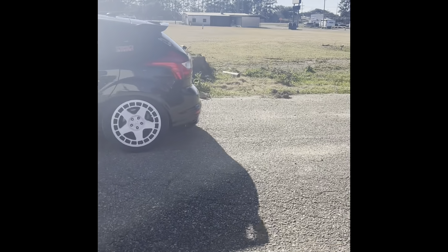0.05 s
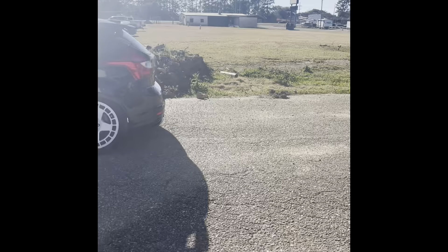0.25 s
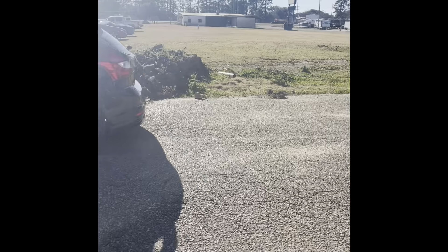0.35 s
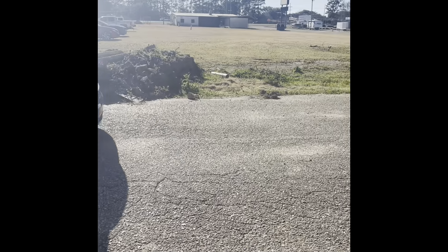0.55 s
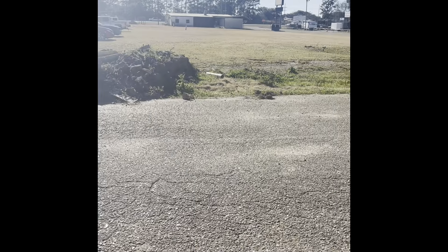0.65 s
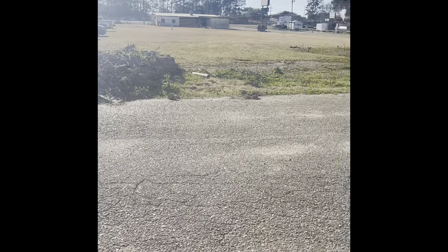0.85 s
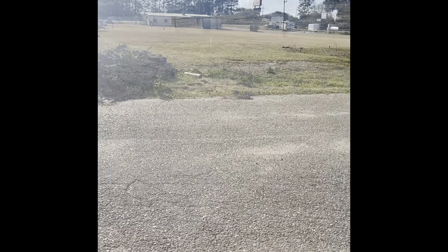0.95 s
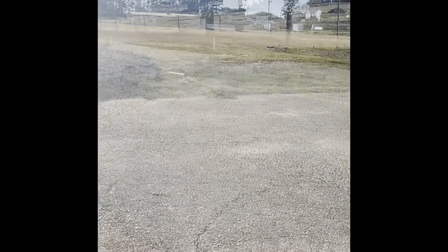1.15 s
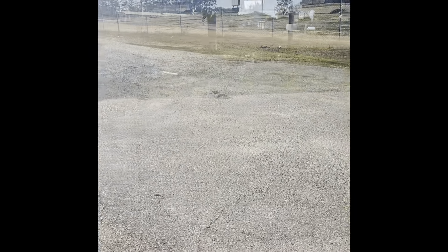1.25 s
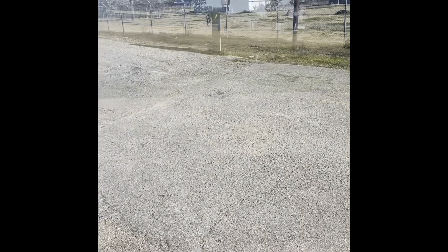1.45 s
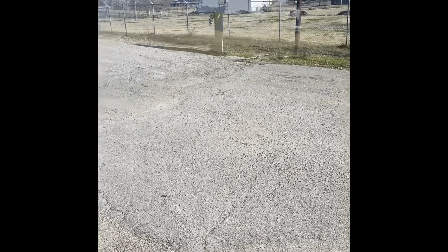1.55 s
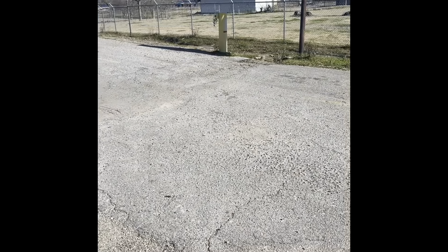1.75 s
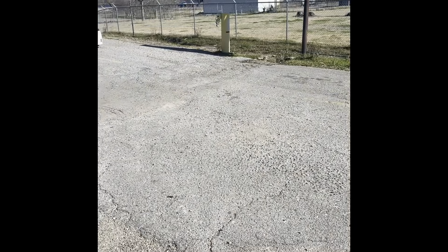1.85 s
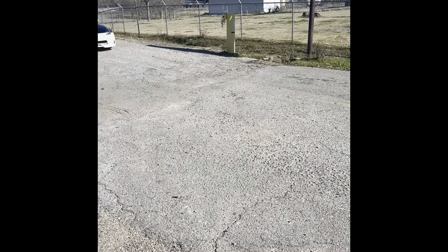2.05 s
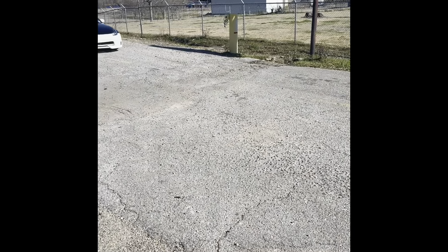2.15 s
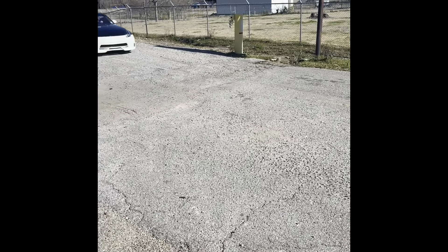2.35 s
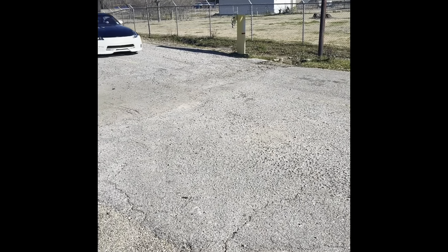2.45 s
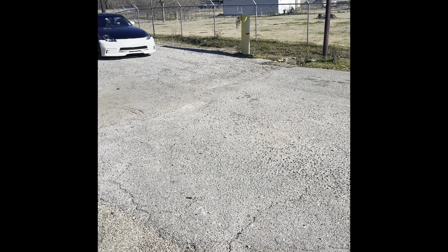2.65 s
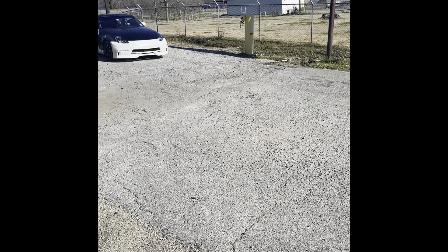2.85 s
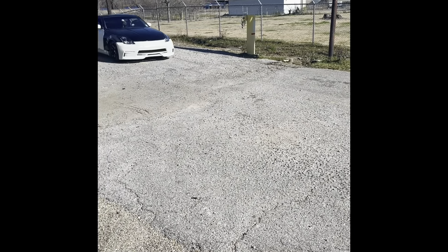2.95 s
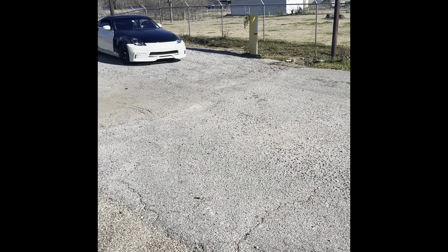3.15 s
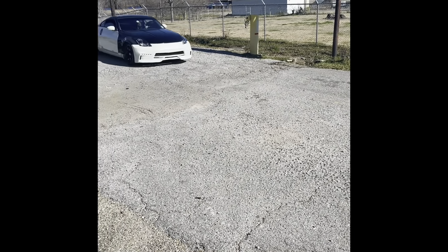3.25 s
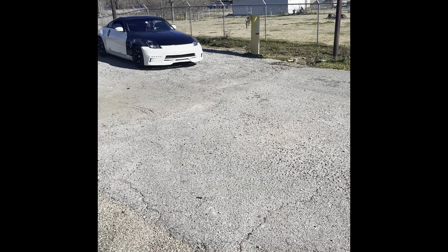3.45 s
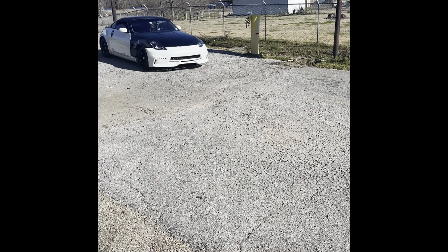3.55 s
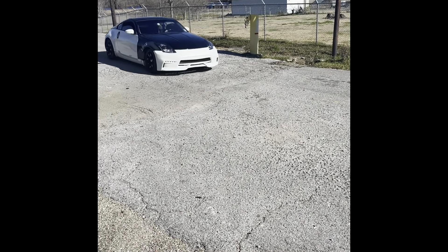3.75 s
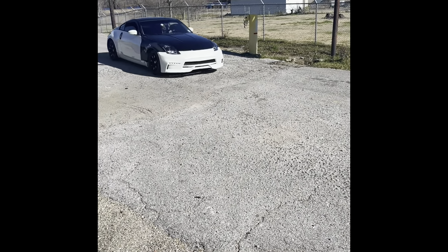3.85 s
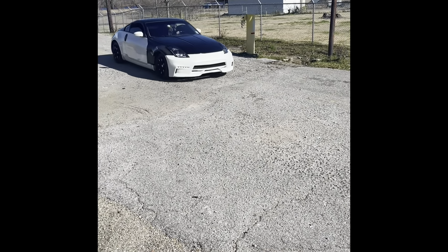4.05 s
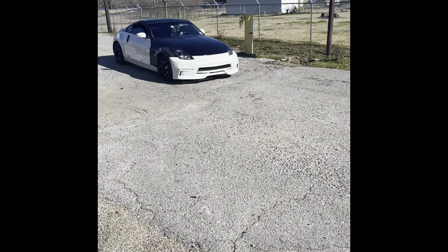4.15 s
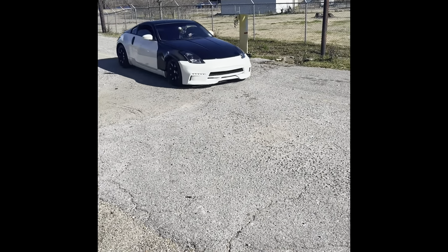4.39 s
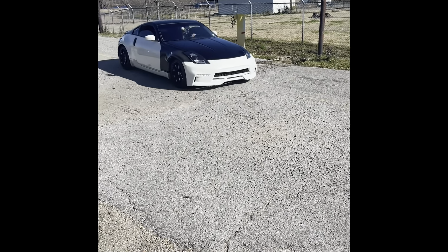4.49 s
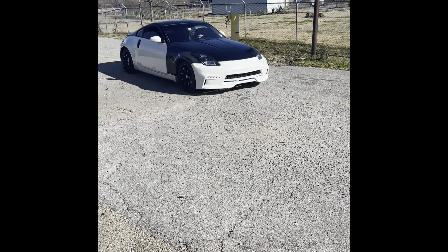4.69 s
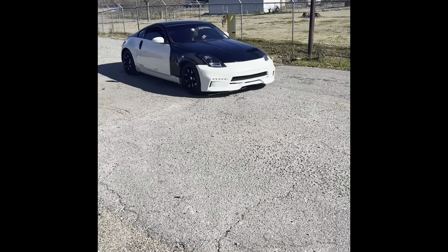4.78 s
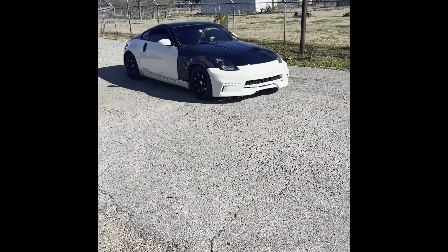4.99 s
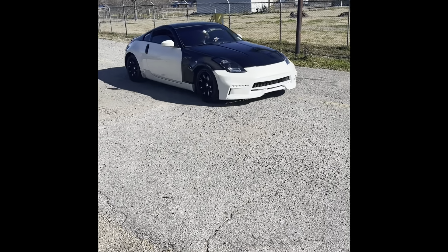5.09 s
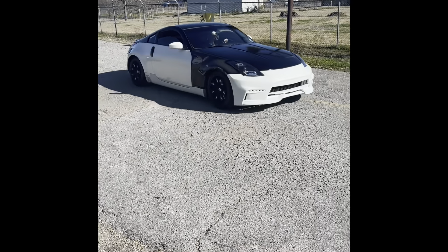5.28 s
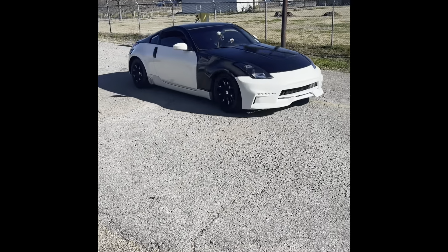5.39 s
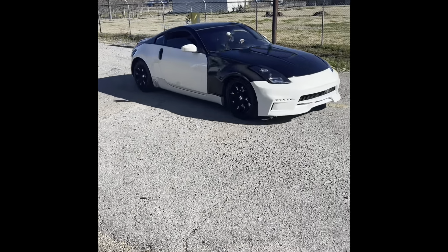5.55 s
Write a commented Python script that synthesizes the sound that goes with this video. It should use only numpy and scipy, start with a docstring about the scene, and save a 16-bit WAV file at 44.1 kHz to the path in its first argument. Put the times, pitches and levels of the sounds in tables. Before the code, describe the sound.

Open-air gravelly lot, light wind, small handheld stereo microphone. From 0 s a close hatchback gives a low, buzzy exhaust drone with a faint wavering whistle around 0.5 s, sinking away by about 1.9 s; a couple of stones knock and a low thump lands near 0.7 s. From 2 to 4 s a soft, deep coupe engine approaches while a farther engine throbs in and out; wind thumps and ragged flutter cluster around 2.6-4 s. Tyres crunch finely, with hollow stone pops thickening from 5 s and sharp knocks near 5.2, 6.2, 6.4 and 7.2 s. The coupe's tone swells from about 5.2 s, revs up in pitch from 6.5 to a peak near 7.2 s, then eases to a steady, brighter hum until about 9.1 s. The far drone returns around 5.4 s, swells near 5.75 s and rises slightly at the end, over thinning grit and stray pops.

```python
"""Gravel lot with cars, in a light wind.
A four-cylinder hatchback drones close by and fades; a six-cylinder coupe rolls up, stops and revs;
a third engine drones farther off. Engines are sums of tones at multiples of their turning rate.
Tyres are crunchy shaped noise; stones are sliding knocks with noise bursts; gusts on the two
microphone ports are low thumps, over lumpy noise opposite in the two ports."""
import sys
import numpy as np
from scipy import signal
from scipy.fft import rfft, irfft
from scipy.io import wavfile

SR = 44100
rng = np.random.default_rng(int(sys.argv[2]) if len(sys.argv) > 2 else 0)


def unload_wav(signal):
    """Save mono or channel-first audio to the path in sys.argv[1] as 16-bit WAV at rate SR, clipped to [-1, 1]."""
    wavfile.write(
        sys.argv[1],
        SR,
        np.round(np.clip(np.atleast_2d(signal).T, -1, 1) * 32767).astype(np.int16),
    )


N = 403074

# hatchback course: (time [s], crank rate [Hz], level [dB], brightness [dB/octave])
HATCH_COURSE = [(0.0, 32.7, -16.5, -4), (0.1, 34.4, -23.5, 8), (0.19, 34.44, -17, -3.5),
                (0.31, 36.08, -19, 0), (0.46, 35.23, -19.5, -2.5), (0.6, 35, -20.5, -0.5),
                (0.655, 35.05, -20, -10.5), (0.72, 35.8, -19.5, -2.5), (0.78, 33.6, -18, -13),
                (0.85, 33.48, -24.5, -4.5), (0.93, 32.6, -25, -6), (1.12, 30.87, -24, -3),
                (1.35, 30.86, -30, -3), (1.6, 30.82, -35.5, -4.5), (1.75, 30.6, -54, -4)]
# hatchback tones: (multiple of crank rate, level [dB])
HATCH_ORDERS = [(1, 5), (1.5, -2), (2, 5.5), (2.5, -11), (3, 0), (3.5, -13), (4, -4.5), (4.5, -17),
                (5, -0.5), (5.5, -9.5), (6, -1.5), (7, -0.5), (7.5, -24), (8, -1), (8.5, -11.5), (9, -3.5),
                (10, -12), (11, 0.5), (12, -15)]
# hatchback exhaust resonances: (frequency [Hz], gain [dB])
HATCH_PIPE = [(30, -14.5), (62, -9.5), (70, -4.5), (105, -2), (140, -3.5), (172, 1), (211, -11.5),
              (226, -28.5), (247, 2.5), (265, -10), (283, -10), (310, -6), (400, -24)]
# coupe course: (time [s], firing rate [Hz], level [dB], brightness [dB/octave])
COUPE_COURSE = [(1.6, 59.93, -35, -10), (2.3, 57.97, -31.5, -24), (2.55, 58.56, -25, -13),
                (2.8, 57.06, -28.5, 0.5), (3.05, 56.98, -28, 1.5), (3.3, 57.58, -35.5, 1),
                (4.0, 57.16, -38, 2), (4.55, 60.1, -35, -12), (5.0, 60.88, -39.5, -5),
                (5.23, 61.6, -20, -11.5), (5.74, 60.67, -24.5, -0.5), (6.06, 62.1, -20, -5.5),
                (6.3, 61.94, -15.5, -12.5), (6.47, 62.2, -17, -2.5), (6.56, 63.77, -15.5, -2),
                (6.67, 65.35, -13, -4), (6.8, 67.95, -13.5, 0.5), (7.0, 70.75, -14.5, 3.5),
                (7.22, 72.84, -14, 4), (7.37, 70.7, -17, 0.5), (7.6, 69.95, -18.5, -1),
                (8.0, 69.66, -20, 1), (8.67, 68.06, -21, 3), (9.14, 66.87, -19.5, -1)]
# coupe tones, in thirds as six cylinders fire unevenly: (thirds of firing rate, level [dB])
COUPE_ORDERS = [(2, -14), (3, -1.5), (4, -27), (5, -31), (6, 1), (7, -39), (8, -42), (9, -0.5), (10, -22),
                (11, -29), (12, -5), (13, -13), (14, -17), (15, -5), (16, -10), (17, -38), (18, -2),
                (21, -9.5), (24, -38)]
# coupe exhaust resonances: (frequency [Hz], gain [dB])
COUPE_PIPE = [(40, -22), (62, -15), (66, -9), (68, 5), (72, 5), (100, 6.5), (122, 0), (142, -2),
              (183, -5.5), (212, -3.5), (243, -9), (285, -9), (305, -21.5), (355, -11.5), (380, -17.5),
              (430, -20), (560, -25)]
# farther car: (time [s], pulse rate [Hz], level [dB], drone centre [Hz], most that tones fall off it [dB])
FAR_COURSE = [(2, 26.04, -35, 129, 8), (2.15, 29.4, -30.5, 146, 10), (2.3, 28.9, -30.5, 143, 22),
              (2.45, 26.97, -20, 135, 23), (2.6, 25.62, -30, 128, 19), (2.85, 26.36, -20.5, 133, 21),
              (3.1, 27.0, -20.5, 139, 17), (3.3, 25.8, -32, 121, 4), (3.6, 27.2, -52, 135.8, 15),
              (5.0, 21.64, -54, 129, -9), (5.38, 24.5, -28.5, 146, 8), (5.55, 27.06, -27, 160, 14),
              (5.75, 27.76, -15.5, 167.1, 21.5), (6.1, 28.03, -20, 167.1, 12), (6.3, 28.24, -27, 86.1, 14),
              (6.7, 28.03, -33, 86.4, 14), (7.2, 27.34, -29, 165, 5), (7.6, 27.66, -21, 166.3, 19),
              (7.85, 27.9, -23.5, 168.2, 10), (8.05, 29.52, -22, 153.2, 6.5), (8.25, 30.14, -24, 92.3, 7),
              (8.45, 31.82, -20, 99.9, 10.5), (8.8, 32.8, -30, 124.4, 3), (9.14, 33.16, -33, 124.9, -1.5)]
# farther car's tones: (multiple of pulse rate, level [dB])
FAR_ORDERS = [(1, -13), (2, -29), (3, 4.5), (3.5, -26), (4, 2.5), (4.5, -13), (5, -3.5), (6, -5), (7, -8),
              (8, -3.5), (10, -10), (11, -8.5)]
# toneless exhaust noise: (time [s], rumble level [dB], low roar level [dB])
EXHAUST_NOISE = [(0, -19.5, -29), (0.3, -23.5, -32), (0.64, -24, -36), (1.3, -27, -45), (1.7, -34.5, -45),
                 (2.6, -31.5, -45), (3.0, -21, -42), (3.4, -26.5, -44), (3.75, -24.5, -39), (4.3, -27, -49),
                 (4.9, -32, -41), (5.35, -26, -40), (6.3, -26, -38), (6.7, -27, -36), (7.1, -29, -33.5),
                 (7.7, -29, -34.5), (8.2, -24.5, -35), (8.6, -26, -34.5), (9.14, -27, -35)]
# exhaust rumble spectrum: (frequency [Hz], density [dB per Hz])
RUMBLE_SPECTRUM = [(20, -22), (35, -16), (50, 2.5), (75, 4), (120, 3.5), (180, -2), (260, -10.5),
                   (340, -24.5), (480, -65)]
# exhaust low roar spectrum: (frequency [Hz], density [dB per Hz])
ROAR_SPECTRUM = [(200, -8), (330, 4.5), (450, -2), (600, -8.5), (760, -8), (950, -14)]
# bass lean to the left: (low edge [Hz], high edge [Hz], lean end [s], lead end [s],
# left minus right [dB], left lead [rad])
BASS_LEAN = [(20, 95, 7.65, 8.3, 1.8, .4), (95, 160, 6.95, 7.55, 3.2, .57),
             (160, 260, 6.55, 7.15, 3.0, .75), (260, 450, 6.2, 6.75, .8, .72)]
# tyres on gravel: (time [s], tyre level [dB], hiss re tyres [dB], fine grit re tyres [dB])
ROAD = [(0.0, -44, -4, -5.5), (0.58, -40.5, -10, -10.5), (1.32, -46, -13.5, -10.5), (1.7, -48, -6, -9),
        (2.67, -47, -6, -8.5), (3.08, -40.5, -6.5, -6.5), (3.33, -48, -4, -5.5), (3.46, -44, -3.5, -3),
        (4.15, -40, -8.5, -9), (4.53, -42.5, -4.5, -5), (5.5, -36.5, -7.5, -9), (5.83, -40, -6, -5.5),
        (7.15, -37, -4, -2), (7.81, -39.5, -5, -9), (8.15, -42, -4.5, -6), (9.09, -40, -7.5, -10),
        (9.14, -38, -9, -14)]
# tyre roar spectrum: (frequency [Hz], density [dB per Hz])
TYRE_SPECTRUM = [(700, -2), (860, 5), (1270, 2.5), (1700, -2.5), (2050, -8)]
# tyre hiss spectrum: (frequency [Hz], density [dB per Hz])
HISS_SPECTRUM = [(2000, -8.5), (2350, -1.5), (2750, -5), (3150, -6), (3600, -6.5), (4300, -8.5),
                 (4900, -8.5)]
# fine grit spectrum: (frequency [Hz], density [dB per Hz])
GRIT_SPECTRUM = [(5000, -52), (5600, -8.5), (6500, -9), (8000, -5.5), (9500, -5), (10800, -3), (11800, -16),
                 (12500, -23), (13200, -41)]
# stones popping under tyres: (time [s], knock peak [dB], pitch [Hz], snap [dB], treble crack [dB])
STONES = [(0.464, -21, 1750, -43, -47), (0.596, -31, 896, -41, -57), (0.639, -25, 900, -35, -48),
          (1.88, -34, 910, -27, -41), (1.901, -27, 790, -50, -57), (2.85, -21.5, 970, -30.5, -57),
          (3.111, -21, 950, -48, -57), (3.165, -22.5, 890, -22.5, -51), (3.524, -31, 1355, -27, -53),
          (3.599, -28, 964, -48, -57), (3.766, -21.5, 1170, -27, -49), (3.784, -20.5, 980, -29, -40),
          (3.791, -28, 1400, -34, -55), (3.858, -23, 1320, -37, -44), (3.893, -34, 900, -44, -55),
          (4.042, -28, 690, -45, -55), (4.048, -25, 880, -33, -48), (4.127, -35, 1230, -18, -40),
          (4.825, -24, 1336, -25, -34), (4.989, -32, 1213, -50, -56), (5.187, -15, 1142, -48, -53),
          (5.307, -27, 1300, -41, -49), (5.365, -33, 1500, -44, -49), (5.513, -42, 1237, -44, -53),
          (5.525, -22.5, 1113, -37, -48), (5.572, -26, 905, -26, -49), (5.66, -27.5, 1183, -29, -37),
          (5.785, -19, 1040, -36, -50), (5.79, -26, 1300, -30, -50), (5.7988, -21, 1146, -17, -36),
          (5.809, -25, 1800, -30, -50), (5.912, -26.5, 800, -50, -53), (6.035, -25.5, 960, -37, -33),
          (6.08, -23.5, 1000, -43, -38), (6.149, -28, 1413, -42, -44), (6.2159, -11, 680, -36, -12.5),
          (6.226, -37, 1510, -40, -35), (6.298, -26, 1350, -34, -29), (6.374, -25, 1830, -36, -36),
          (6.3787, -25, 928, -19, -30), (6.396, -13, 730, -23, -28.5), (6.4308, -22, 1900, -41, -32),
          (6.566, -27, 850, -38, -50), (6.63, -16.5, 1050, -21, -32), (6.74, -22.5, 966, -42, -32),
          (6.821, -35, 780, -31, -31), (6.918, -20.5, 1040, -23, -38), (7.157, -40, 1028, -39, -27),
          (7.219, -25, 881, -30, -36), (7.2435, -13.5, 1070, -22, -18.5), (7.326, -38, 1196, -39, -24),
          (7.392, -20.5, 1494, -28, -30), (7.42, -36, 1205, -23, -40), (7.532, -19, 1400, -21, -30),
          (7.57, -24, 1800, -45, -53), (7.698, -27, 1298, -21.5, -35), (7.725, -27, 1115, -32, -48),
          (7.765, -25, 1600, -45, -55), (7.808, -25, 1146, -42, -60), (7.928, -22.5, 900, -26.5, -51),
          (8.104, -30, 933, -25, -30), (8.442, -25, 1000, -38, -40), (8.4725, -21, 1049, -22, -50),
          (8.5, -18, 1201, -28, -44)]
# strongest low thumps, from gusts on the ports or exhaust pops: (time [s], peak [dB], pitch [Hz])
THUMPS = [(0.686, -13, 129.5), (1.537, -30, 230), (1.879, -20.5, 340.7), (1.91, -21.5, 242),
          (2.063, -23.5, 383), (2.119, -24, 332), (2.523, -24, 183.5), (2.696, -26, 268.9),
          (2.761, -24, 238.8), (2.952, -21, 232), (3.06, -34, 199.7), (3.123, -21, 198.6),
          (3.134, -22, 209), (3.155, -11, 245), (3.197, -32, 213), (3.241, -20.5, 240), (3.278, -33, 200.7),
          (3.285, -19.5, 373), (3.393, -23.5, 336), (3.457, -23, 257), (3.536, -25, 199.6),
          (3.548, -19, 236), (3.649, -21.5, 302), (3.662, -20, 253), (3.676, -19.5, 231),
          (3.702, -22.5, 333), (3.78, -25, 217), (3.793, -24, 190), (3.82, -27, 299), (3.836, -19.5, 204),
          (3.888, -24.5, 252), (3.933, -24.5, 326), (3.977, -22.5, 326), (3.987, -26, 302), (4.0, -25, 260)]
# spells of stronger port-opposed noise: (start [s], end [s], rise [dB])
OPPOSED_SPELLS = [(-0.3, 0.702, 7.5), (2.843, 3.067, 7.5), (3.454, 4.048, 7.5), (4.129, 4.656, 13),
                  (4.997, 5.194, 9), (6.031, 6.196, 8)]
# bass buffets, opposite in the two ports: (start [s], end [s], level [dB])
BUFFETS = [(1.651, 1.8, -46), (2.28, 2.42, -39), (2.847, 3.048, -30), (4.15, 4.949, -38),
           (5.002, 5.35, -41)]
# faint whines: (start [s], end [s], centre [Hz], width [Hz], level [dB], fade [s])
WHINES = [(8.2, 10, 4150, 100, -56, .2), (0, 0.11, 2150, 83, -46, .02), (2.6, 5.6, 2300, 220, -53, .6),
          (4.1, 5.3, 3500, 120, -60, .3), (4.1, 5.9, 3720, 90, -62, .3)]
# likeness of shaped noise in the two channels: (frequency [Hz], correlation [0-1])
LIKENESS = [(60, 1), (250, 1), (600, 0.82), (1200, 0.94), (3000, 0.75), (8000, 0.98), (12000, 1)]
# phase between ports: (frequency [Hz], left lead [rad])
PORT_PHASE = [(0, 0), (40, -.02), (260, -.12), (560, .1), (850, -.1), (2500, .6), (4130, .95), (4880, 3.14),
              (5600, 6.15), (6200, 6.5), (8440, 9.1), (9560, 9.65), (11500, 11.7), (11800, 12.57),
              (13000, 13.2)]
# level between ports: (frequency [Hz], left minus right [dB])
PORT_BALANCE = [(60, 0), (130, -0.5), (200, -0.9), (350, -2), (640, -0.6), (1150, -1.4), (2500, 0),
                (12000, 0)]

PIVOT_HZ = 130   # brightness tilts tones above this
SMEAR_HZ, BASS_LAG_RAD, TREBLE_LEAD_RAD = 70, 5.3, .25   # at SMEAR_HZ; each pulse sweeps downward
WHISTLE_HZ, WHISTLE_SAG_HZ_PER_S, WHISTLE_WAVER_HZ = 1790, 90, 55
WHISTLE_DB, WHISTLE_TOP_S, WHISTLE_RISE_DB_PER_S, WHISTLE_FALL_DB_PER_S = -42, 0.5, 12, 20
WHISTLE_THROB, WHISTLE_FLUTTER = .8, .6   # shares: once a crank turn, at random
FAR_FALL_DB_PER_OCTAVE = 50   # away from the drone centre
RASP = .55   # share by which the low roar swells with each pulse
LEAN_START_S, LEAN_FADE_S = 4.6, .25
KNOCK_CYCLES, KNOCK_DROP, KNOCK_DROP_CYCLES = 3.7, 1.2, .55   # drop: extra pitch share at the start
BOUNCE_S, BOUNCE_LOSS_DB = (.004, .008), 8   # two bounces a stone, loss at each
SCATTER_DB, SCATTER_T60_S = -9, .075   # small stones scattering; level re knock
THUMP_CYCLES, THUMP_DROP, THUMP_DROP_S = 2.3, .55, .004
THUMP_TAIL_DB, THUMP_TAIL_T60_S = -6, .08   # level re thump
GUSTY_S, WEAK_GUST_DB, WEAK_GUST_HZ = (2.6, 4.05), (-36, -27), (180, 380)   # random ranges
OPPOSED_DB, SPELL_EDGE_S = -52.5, 0.024   # level before the spells' rise
ROAR_SINKS_FROM_DB, ROAR_SINK_DB_PER_DB = 7.5, 6.7   # the low roar sinks in the strongest spells
CUTOFF_HZ = 15600
BURST_SAMPLES = 1500


def from_db(db):
    """Decibels to gain."""
    return 10 ** (np.asarray(db) / 20)


def rms_one(x):
    """Scale to unit rms."""
    return x / np.sqrt(np.mean(x ** 2) + 1e-20)


def clock_s():
    """Time of each sample."""
    return np.arange(N) / SR


def in_time(rows):
    """Each column of a curve table, sample by sample."""
    times_s, *columns = np.transpose(rows)
    return [np.interp(clock_s(), times_s, column) for column in columns]


def at_hz(points, hz):
    """Read a spectrum on a log-frequency axis."""
    points_hz, values = np.transpose(points)
    return np.interp(np.log(hz), np.log(points_hz), values)


def hold(start_s, end_s, edge_s):
    """Gate from 0 to 1 and back, its ramps centred on start and end."""
    t = clock_s()
    return np.clip(np.minimum(t - start_s, end_s - t) / edge_s + .5, 0, 1)


def drift(rate_hz):
    """Slow random wander, rms 1: twice-smoothed noise at a fortieth of the sample rate."""
    pole = np.exp(-80 * np.pi * rate_hz / SR)
    noise = rng.standard_normal(N // 40 + 2002)
    slow = signal.lfilter([1], [1, -2 * pole, pole * pole], noise)[2000:]
    return np.interp(np.arange(N) / 40, np.arange(len(slow)), rms_one(slow))


def band(x, low_hz, high_hz):
    """Butterworth band-pass."""
    return signal.sosfilt(signal.butter(2, [low_hz, high_hz], "band", fs=SR, output="sos"), x)


def coloured(spectrum, source):
    """Shape a shared and an unshared signal into two partly alike channels; rms 1."""
    hz = np.maximum(np.fft.rfftfreq(N, 1 / SR), 1)
    alike = np.clip(at_hz(LIKENESS, hz), 0, .99)
    octaves_outside = np.abs(np.log2(hz / np.clip(hz, spectrum[0][0], spectrum[-1][0])))
    mid, side = rfft(source) * from_db(at_hz(spectrum, hz) - 40 * octaves_outside)
    pair = np.sqrt(1 + alike) * mid + np.sqrt(1 - alike) * side * [[1], [-1]]
    return rms_one(irfft(pair, N))


def gritty(per_s, spread_db, share, flicker_db, crunch_s):
    """Noise that swells in short crunches as small stones shift; two unrelated draws."""
    sizes = from_db(spread_db * np.minimum(rng.exponential(1, N), 3.5))
    starts = sizes * (rng.random(N) < per_s * from_db(3.5 * drift(5)) / SR)
    crunch = signal.lfilter([1], [1, -np.exp(-1 / (crunch_s * SR))], starts)
    swell = (1 + share * rms_one(crunch)) * from_db(flicker_db * drift(14.3))
    return rng.standard_normal((2, N)) * swell


def wavelet(hz, cycles, drop, drop_s):
    """A few cycles that swell fast, fall in pitch and stop; peak 1."""
    t = np.arange(BURST_SAMPLES) / SR
    turns = np.cumsum(hz * (1 + drop * np.exp(-t / drop_s))) / SR
    envelope = np.sin(np.pi * np.clip(turns / cycles, 0, 1) ** .7)
    shape = envelope * np.sin(2 * np.pi * turns)
    return shape / np.abs(shape).max()


def burst(low_hz, high_hz, t60_s):
    """A click and dying noise in one band; peak 1."""
    t = np.arange(BURST_SAMPLES) / SR
    struck = rng.standard_normal(BURST_SAMPLES) * from_db(-60 * t / t60_s)
    struck[0] += 4 * np.sqrt(SR / (high_hz - low_hz)) / 3
    rung = band(struck, low_hz, high_hz)
    return rung / np.abs(rung).max()


def exhaust(pipe, tilt_db):
    """The pipe's resonances, plus the brightness tilt in dB per octave above the pivot."""
    return lambda hz: at_hz(pipe, hz) + tilt_db * np.log2(np.maximum(hz / PIVOT_HZ, 1))


def engine(base_hz, level_db, orders, pipe_db, wobble_db, wander_rad):
    """Tones in step as pulses, coloured by the exhaust; uneven firing wavers strength and phase."""
    phase, out = 2 * np.pi * np.cumsum(base_hz) / SR, np.zeros(N)
    for order, order_db in orders:
        tone_hz = order * base_hz
        wobble = wobble_db * (drift(4.5) + 0.67 * drift(22))
        tone_db = level_db + order_db + pipe_db(tone_hz) + wobble
        smear = TREBLE_LEAD_RAD * (tone_hz / SMEAR_HZ) ** 2 - BASS_LAG_RAD * (SMEAR_HZ / tone_hz) ** 2
        wander = wander_rad * np.sqrt(order) * drift(2.6)
        out += from_db(tone_db) * np.sqrt(2) * np.cos(order * phase + wander + smear)
    return out


def hatchback():
    """Crank-order drone that fades away, plus the intake whistle."""
    crank_hz, level_db, tilt_db = in_time(HATCH_COURSE)
    drone = engine(crank_hz, level_db, HATCH_ORDERS, exhaust(HATCH_PIPE, tilt_db), 2.6, .24)
    fade = np.clip((1.95 - clock_s()) / 0.29, 0, 1)
    return fade * drone + intake_whistle(crank_hz)


def intake_whistle(crank_hz):
    """A sagging, wavering sine that throbs once a crank turn and flutters at random."""
    t = clock_s()
    rise_db, fall_db = WHISTLE_RISE_DB_PER_S * (t - WHISTLE_TOP_S), WHISTLE_FALL_DB_PER_S * (WHISTLE_TOP_S - t)
    level_db = WHISTLE_DB + np.minimum(rise_db, fall_db)
    throb = 1 + WHISTLE_THROB * np.cos(2 * np.pi * np.cumsum(crank_hz) / SR)
    flutter = 1 + WHISTLE_FLUTTER * drift(123)
    pitch_hz = WHISTLE_HZ - WHISTLE_SAG_HZ_PER_S * t + WHISTLE_WAVER_HZ * drift(34)
    return flutter * throb * np.sin(2 * np.pi * np.cumsum(pitch_hz) / SR) * from_db(level_db)


def coupe():
    """Tones on thirds of the firing rate: fades in at low speed, then revs at a standstill."""
    firing_hz, level_db, tilt_db = in_time(COUPE_COURSE)
    fade_in = np.clip((clock_s() - 1.4) / 0.37, 0, 1)
    pipe_db = exhaust(COUPE_PIPE, tilt_db)
    return fade_in * engine(firing_hz / 3, level_db, COUPE_ORDERS, pipe_db, 1.3, .08)


def far_car():
    """A low drone that comes and goes, its tones strongest near a moving centre."""
    pulse_hz, level_db, centre_hz, most_db = in_time(FAR_COURSE)
    fade_in = np.clip((clock_s() - 1.85) / 0.052, 0, 1)

    def near_centre_db(hz):
        """Gain falling away from the centre, down to a floor."""
        return -np.minimum(FAR_FALL_DB_PER_OCTAVE * np.abs(np.log2(hz / centre_hz)), most_db)

    return fade_in * engine(pulse_hz, level_db, FAR_ORDERS, near_centre_db, 1.2, .08)


def exhaust_rumble(level_db):
    """Toneless bass noise of uneven strength."""
    source = rng.standard_normal((2, N)) * from_db(2.5 * drift(16.5))
    return from_db(level_db) * coloured(RUMBLE_SPECTRUM, source)


def exhaust_roar(level_db):
    """Toneless low-mid noise, swelling with each exhaust pulse."""
    return from_db(level_db) * pulses() * coloured(ROAR_SPECTRUM, gritty(60, 3.0, .25, 2.0, .004))


def pulses():
    """A swell on each pulse: at the hatchback's crank rate, then the coupe's firing rate."""
    hatch_on = clock_s() < HATCH_COURSE[-1][0]
    pulse_hz = np.where(hatch_on, in_time(HATCH_COURSE)[0], in_time(COUPE_COURSE)[0])
    return 1 + RASP * np.cos(2 * np.pi * np.cumsum(pulse_hz) / SR + .5 * drift(8))


def lean(x):
    """For a while, raises and advances each bass band on the left, the opposite on the right."""
    hz, spectrum, out = np.fft.rfftfreq(N, 1 / SR), rfft(x), x.copy()
    for low_hz, high_hz, lean_end_s, lead_end_s, lean_db, lead_rad in BASS_LEAN:
        part = spectrum * ((hz >= low_hz) & (hz < high_hz))
        halves = np.array([[.5], [-.5]])
        gain = from_db(lean_db * hold(LEAN_START_S, lean_end_s, LEAN_FADE_S) * halves)
        phase = lead_rad * hold(LEAN_START_S, lead_end_s, LEAN_FADE_S) * halves
        out += (gain * np.cos(phase) - 1) * irfft(part, N)
        out += gain * np.sin(phase) * irfft(1j * part, N)   # quarter-turn copy
    return out


def tyres_on_gravel():
    """Roar and hiss share one crunching noise; fine grit has its own."""
    tyres_db, hiss_db, grit_db = in_time(ROAD)
    crunching = gritty(70, 4.5, .42, 1.3, .004)
    tyres = coloured(TYRE_SPECTRUM, crunching)
    hiss = from_db(hiss_db) * coloured(HISS_SPECTRUM, crunching)
    grit_gain = from_db(grit_db + 1.5 * drift(3))
    grit = grit_gain * coloured(GRIT_SPECTRUM, gritty(30, 5.0, .45, 1.3, .002))
    return from_db(tyres_db) * (tyres + hiss + grit)


def stones():
    """Each stone knocks with falling pitch, bounces twice, scatters, snaps and cracks in the treble."""
    out = np.zeros(N + 3000)
    for start_s, peak_db, hz, snap_db, crack_db in STONES:
        i = round(start_s * SR)
        hit = out[i:i + BURST_SAMPLES]   # view into out
        hit += from_db(peak_db + SCATTER_DB) * burst(hz * .55, hz * 2.0, SCATTER_T60_S)
        gaps_s, detunes = rng.uniform(*BOUNCE_S, size=3), rng.uniform(.93, 1.07, size=3)
        for touch, (gap_s, detune) in enumerate(zip(gaps_s, detunes)):
            j = i + round(touch * gap_s * SR)
            knock = wavelet(hz * detune, KNOCK_CYCLES, KNOCK_DROP, KNOCK_DROP_CYCLES / hz)
            out[j:j + BURST_SAMPLES] += from_db(peak_db - BOUNCE_LOSS_DB * touch) * knock
        hit += from_db(snap_db) * burst(1200, 5600, .016)
        crack = burst(3500, 8600, .006)
        crack += 3.2 * band(burst(9600, 11500, .005), 9400, 11300)
        crack += .03 * burst(11800, 16000, .003)
        hit += from_db(crack_db) * crack
    return out[:N]


def thumps():
    """Listed and weak random thumps: a push of a few cycles, falling in pitch, with a ragged tail."""
    out = np.zeros(N + BURST_SAMPLES)
    weak = rng.uniform(*np.transpose([GUSTY_S, WEAK_GUST_DB, WEAK_GUST_HZ]), size=(26, 3))
    for start_s, peak_db, hz in [*THUMPS, *weak]:
        i = round(start_s * SR)
        push = from_db(peak_db) * wavelet(hz, THUMP_CYCLES, THUMP_DROP, THUMP_DROP_S)
        tail = from_db(peak_db + THUMP_TAIL_DB) * burst(hz * .6, hz * 2.2, THUMP_TAIL_T60_S)
        out[i:i + BURST_SAMPLES] += push + tail
    return out[:N]


def buffets():
    """Short spells of deep lumpy noise, opposite in the two ports."""
    gain = sum(from_db(db) * hold(start_s, end_s, SPELL_EDGE_S) for start_s, end_s, db in BUFFETS)
    lumps = band(rng.standard_normal(N), 45, 260) * from_db(4.4 * drift(12))
    return gain * rms_one(lumps) * [[1], [-1]]


def spells_db():
    """Rise of the port-opposed noise in each spell."""
    return sum(db * hold(start_s, end_s, SPELL_EDGE_S) for start_s, end_s, db in OPPOSED_SPELLS)


def opposed_noise(rise_db):
    """Lumpy low noise, opposite in the two ports."""
    noise = band(band(rng.standard_normal(N), 220, 1400), 200, 1270)
    lumps = noise * from_db(2.4 * drift(15))
    return from_db(OPPOSED_DB + rise_db) * rms_one(lumps) * [[1], [-1]]


def whines():
    """Narrow bands of noise that fade in and out."""
    t, out = clock_s(), np.zeros(N)
    for start_s, end_s, hz, width_hz, level_db, fade_s in WHINES:
        fade = np.clip(np.minimum(t - start_s, end_s - t) / fade_s, 0, 1)
        tone = band(rng.standard_normal(N), hz - width_hz / 2, hz + width_hz / 2)
        out += fade * from_db(level_db) * rms_one(tone)
    return out


def scene():
    """Engines over tyres, stones, thumps and port-opposed noise."""
    rumble_db, roar_db = in_time(EXHAUST_NOISE)
    rise_db = spells_db()
    roar_db = roar_db - ROAR_SINK_DB_PER_DB * np.maximum(rise_db - ROAR_SINKS_FROM_DB, 0)
    engines = hatchback() + coupe() + far_car()
    cars = lean(engines + exhaust_rumble(rumble_db) + exhaust_roar(roar_db))
    gravel = tyres_on_gravel() + stones()
    return cars + gravel + thumps() + buffets() + opposed_noise(rise_db) + whines()


def record(dry):
    """The two ports differ in phase and level; bass and top are cut, peaks rounded."""
    hz = np.fft.rfftfreq(N, 1 / SR)
    lead_rad = np.interp(hz, *np.transpose(PORT_PHASE))
    half_shift = np.exp(.5j * lead_rad) * from_db(at_hz(PORT_BALANCE, hz + 1) / 2)
    wet = irfft(rfft(dry) * half_shift ** [[1], [-1]], N)   # left gets it, right its inverse
    wet = signal.sosfilt(signal.butter(2, 42, "high", fs=SR, output="sos"), wet)
    rounded = 1.3 * np.tanh(wet / 1.3)
    return signal.sosfilt(signal.cheby2(10, 60, CUTOFF_HZ, fs=SR, output="sos"), rounded)


dry = scene()
out = record(dry)
unload_wav(out)
```